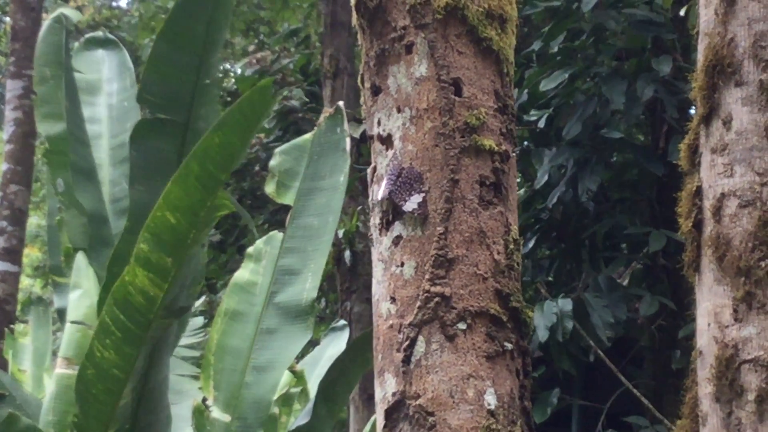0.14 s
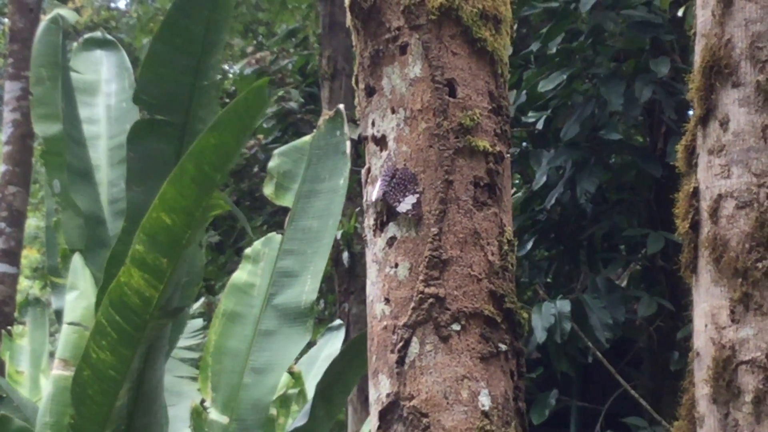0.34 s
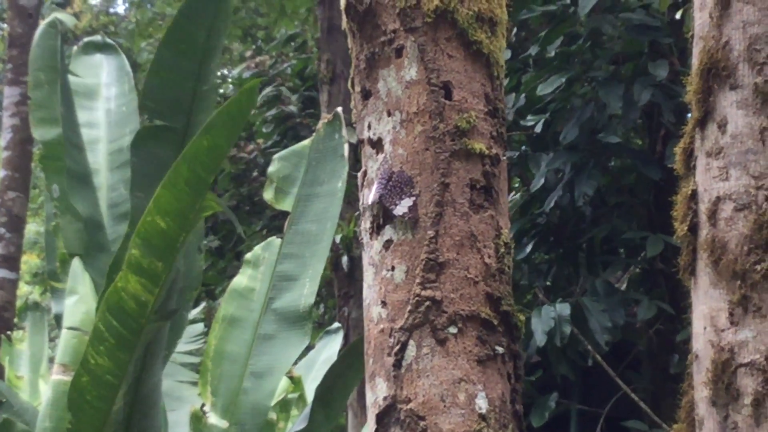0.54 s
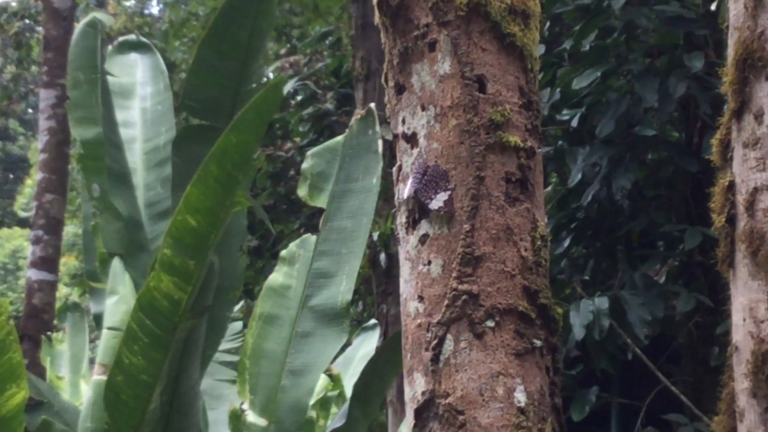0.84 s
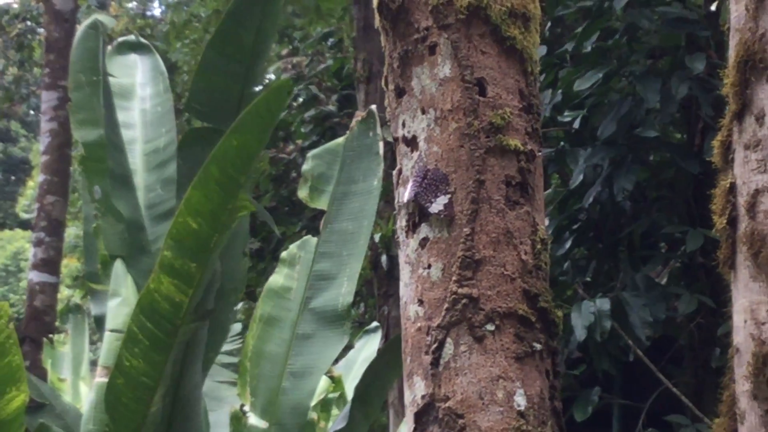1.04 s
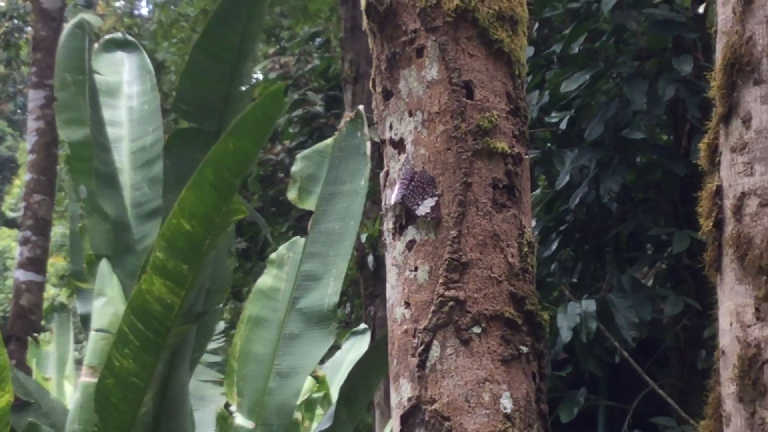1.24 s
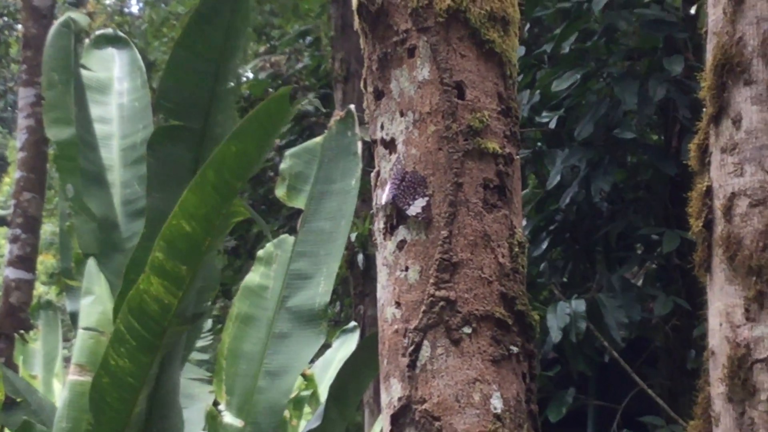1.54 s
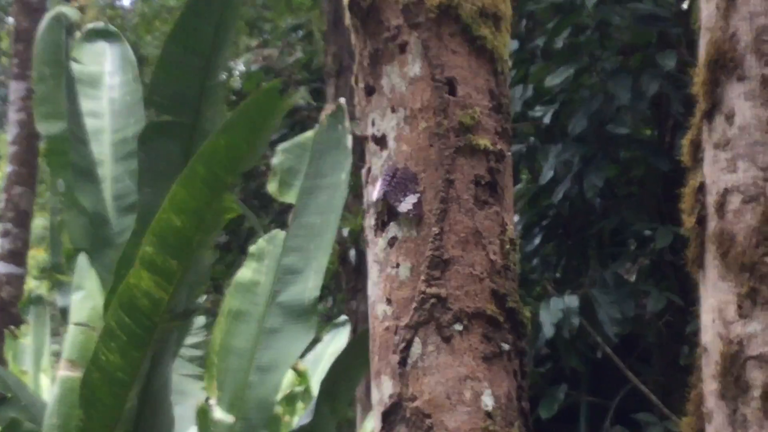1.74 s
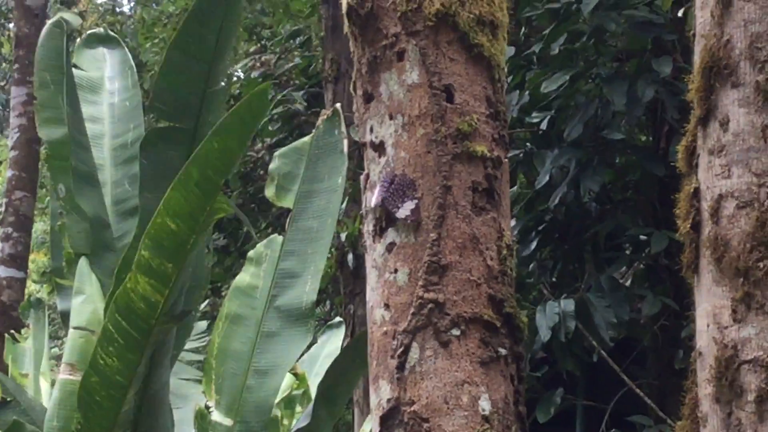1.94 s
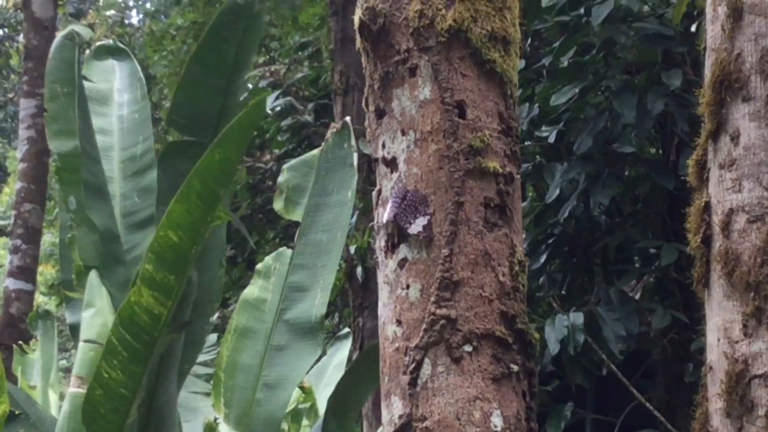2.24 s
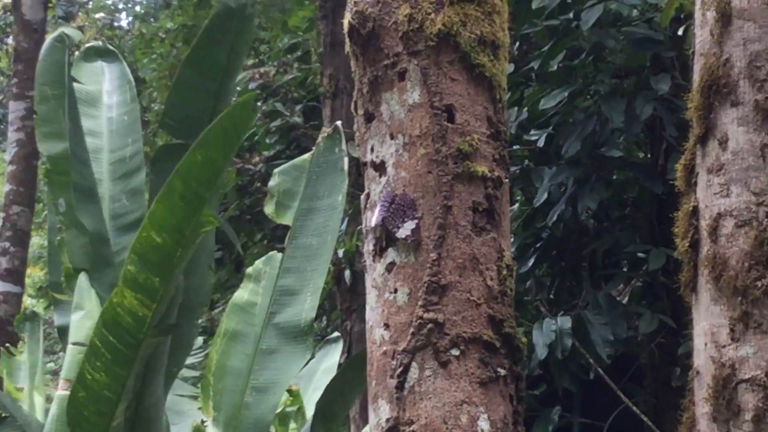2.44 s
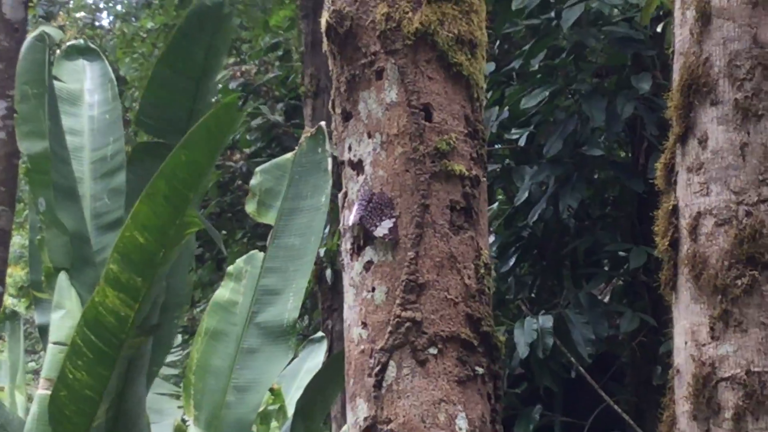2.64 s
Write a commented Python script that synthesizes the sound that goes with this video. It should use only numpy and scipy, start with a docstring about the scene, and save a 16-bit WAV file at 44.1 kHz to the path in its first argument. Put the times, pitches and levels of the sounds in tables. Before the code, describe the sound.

A steady, shrill cicada chorus fills a forest, with close rattling buzzes echoing off the trees and blending into a far high hiss. Below it are a faint low background rumble and occasional soft microphone handling bumps.

```python
"""Cicadas in a tropical forest.

Two near cicadas each snap their tymbals in a pair of sharp clicks, some forty times a second.
A far crowd is smeared by the trees into a high hiss. Below lie faint air, hum, a thin insect whine,
rumble, stirring leaves and a few soft bumps on the hand-held microphone."""
import sys
import numpy as np
from scipy import signal
from scipy.fft import rfft, irfft
from scipy.io import wavfile

SR = 44100
rng = np.random.default_rng(int(sys.argv[2]) if len(sys.argv) > 2 else 0)


def wrap_up_sound(samples):
    """Save the sound to the file named by the first command line argument, as 16-bit audio."""
    columns = np.atleast_2d(samples).T
    # keep every value between -1 and 1, then stretch to whole-number steps
    tamed = np.clip(columns, -1, 1)
    steps = np.round(tamed * 32767).astype(np.int16)
    wavfile.write(sys.argv[1], SR, steps)


N = 123921

# Noise spectra. Each row: frequency in Hz, relative density in dB.
AIR_SPECTRUM = [(20, -19), (33, -5.5), (60, -1.5), (125, -8), (200, -9), (330, -11), (460, -16.5),
                (800, -20.5), (1300, -21), (2200, -25), (6000, -28.5), (13000, -31)]
RUMBLE_SPECTRUM = [(30, -19), (90, -3.5), (170, 0), (310, -2), (450, -14.5), (1000, -35.5), (4000, -62)]
RUSTLE_SPECTRUM = [(600, -9), (1300, -3.5), (3200, 1.5), (4500, -0.5), (7000, -12.5), (13000, -26)]
# Noise envelopes. Each row: time in seconds, level in dB.
RUMBLE_ENVELOPE = [(0, -77.5), (.2, -80), (.42, -80.5), (.57, -72), (.78, -75.5), (.87, -81.5),
                   (1.1, -74.5), (1.36, -83), (1.55, -74.5), (1.85, -83), (2.08, -76), (2.25, -82.5),
                   (2.5, -76.5), (2.81, -85)]
RUSTLE_ENVELOPE = [(0, -80), (.6, -84.5), (.83, -82), (1.1, -84.5), (1.32, -80), (1.7, -78), (1.9, -84.5),
                   (2.2, -83), (2.45, -96), (2.81, -94)]
# Foliage ticks. Each row: start in seconds, level in dB, resonance in Hz.
LEAF_TICKS = [(.825, -75, 3300), (1.002, -71, 2500), (1.30, -72, 3770), (2.18, -73, 4200),
              (2.535, -77, 4700)]
# Microphone bumps. Each row: centre in seconds, envelope peak in dB, frequency in Hz.
MIC_BUMPS = [(.06, -58.5, 60), (0.289, -59.5, 56.3), (0.631, -61, 87), (.695, -57, 78), (0.917, -61, 58.3),
             (1.14, -64, 70), (1.28, -62.5, 79), (1.574, -60, 54.7), (1.674, -56.5, 55), (2.10, -63, 73),
             (2.343, -59.5, 54), (2.735, -65, 55.4)]
# Song filters. Each row: frequency in Hz, relative gain in dB.
FAR_SONG_EQ = [(5000, -55.5), (6100, -28), (7000, -13.5), (8000, -1.5), (9000, 2), (9700, 3), (10200, -4.5),
               (11200, -6.5), (12200, -9), (13300, -27.5)]
NEAR_SONG_EQ = [(5000, -61), (6100, -25.5), (7000, -13.5), (8000, -8), (9200, 0.5), (10500, -0.5),
                (11700, -2.5), (12600, -7), (13400, -14)]
# Near cicadas. Each row: start in seconds, cycle rate in Hz, gap within the click pair in seconds,
# direct level in dB, tymbal resonance in Hz.
NEAR_CICADAS = [(.0038, 44.72, .0072, -54.0, 9900), (.0031, 40.57, .00918, -56.0, 9800)]

AIR_DB = -68.5
HUM_HZ, HUM_DB = 80.8, -80.5
WHINE_HZ, WHINE_WIDTH_HZ, WHINE_DB = 2604, 90, -88.5
TICK_DECAY_S, TICK_WIDTH_HZ = .011, 1600
BUMP_SIGMA_S = .012
FAR_RATE_HZ, FAR_RATE_SPREAD, FAR_GAP_S, FAR_DB = 43, .09, .008, -51.5
LEAF_T60_S = .015
ECHO_T60_S, ECHO_GAIN_DB, ECHO_SWAY_HZ = .9, 4.5, .3
PERIOD_SPREAD, CYCLE_JITTER_S, GAP_JITTER_S = .002, .00016, .000014
TYMBAL_WIDTH_HZ, CLICK_SPREAD_DB = 4500, 1.25
CUTOFF_HZ = 13400


def from_db(db):
    """Decibels to gain."""
    return 10 ** (np.asarray(db) / 20)


def unit_rms(x):
    """Scale to unit rms."""
    return x / np.sqrt(np.mean(x ** 2) + 1e-20)


def colour(x, spectrum):
    """Filter by (Hz, dB) points; unit rms."""
    hz, db = np.transpose(spectrum)
    bins_hz = np.maximum(np.fft.rfftfreq(N, 1 / SR), 1)
    gain = from_db(np.interp(np.log(bins_hz), np.log(hz), db))
    return unit_rms(irfft(rfft(x) * gain, N))


def resonate(x, hz, width_hz):
    """Two-pole resonance, unit peak gain."""
    radius = np.exp(-np.pi * width_hz / SR)
    zeros = np.array([1, 0, -1]) * (1 - radius ** 2) / 2
    poles = [1, -2 * radius * np.cos(2 * np.pi * hz / SR), radius ** 2]
    return signal.lfilter(zeros, poles, x + 1e-18)


def scatter(x, t60_s):
    """Dense decaying reflections off leaves and trunks, built up from the start; unit rms."""
    decay_db = np.maximum(-60 * np.arange(N) / SR / t60_s, -200)
    tail = rng.standard_normal(N) * from_db(decay_db)
    return unit_rms(irfft(rfft(x) * rfft(tail), N))


def background(t):
    """Soft air, a low hum and the whine of a very distant insect."""
    air = from_db(AIR_DB) * colour(rng.standard_normal(N), AIR_SPECTRUM)
    hum = from_db(HUM_DB) * unit_rms(np.sin(2 * np.pi * HUM_HZ * t))
    whine = from_db(WHINE_DB) * unit_rms(resonate(rng.standard_normal(N), WHINE_HZ, WHINE_WIDTH_HZ))
    return air + hum + whine


def rumble(t):
    """Low noise swells and sinks."""
    level_db = np.interp(t, *np.transpose(RUMBLE_ENVELOPE))
    return from_db(level_db) * colour(rng.standard_normal(N), RUMBLE_SPECTRUM)


def foliage(t):
    """Leaves rustle faintly, with a few tiny ticks."""
    level_db = np.interp(t, *np.transpose(RUSTLE_ENVELOPE))
    out = from_db(level_db) * colour(rng.standard_normal(N), RUSTLE_SPECTRUM)
    for start_s, db, hz in LEAF_TICKS:
        decay = (t >= start_s) * np.exp(-np.abs(t - start_s) / TICK_DECAY_S)
        out += from_db(db) * decay * unit_rms(resonate(rng.standard_normal(N), hz, TICK_WIDTH_HZ))
    return out


def mic_bumps(t):
    """Each bump on the microphone is a low swell of a few cycles."""
    out = np.zeros(N)
    for centre_s, db, hz in MIC_BUMPS:
        swell = np.exp(-.5 * ((t - centre_s) / BUMP_SIGMA_S) ** 2)
        out += from_db(db) * swell * np.cos(2 * np.pi * (hz * (t - centre_s) + rng.random()))
    return out


def clicks(times_s):
    """Impulses of slightly uneven strength."""
    out = np.zeros(N)
    at = np.round(times_s * SR).astype(int)
    gains = from_db(CLICK_SPREAD_DB * rng.standard_normal(len(at)))
    inside = (at >= 0) & (at < N)
    out[at[inside]] = gains[inside]
    return out


def tymbal(start_s, rate_hz, gap_s, cycles=180):
    """Each muscle cycle buckles the tymbal in and lets it spring back: two opposite clicks."""
    periods_s = (1 + PERIOD_SPREAD * rng.standard_normal(cycles)) / rate_hz
    buckle_s = start_s + np.cumsum(periods_s) - periods_s[0]
    buckle_s += CYCLE_JITTER_S * rng.standard_normal(cycles)
    inward = clicks(buckle_s)
    outward = clicks(buckle_s + gap_s + GAP_JITTER_S * rng.standard_normal(cycles))
    return inward - outward


def far_cicadas(count=14):
    """A crowd, each at its own rate, blurred by foliage."""
    crowd = np.zeros(N)
    for phase, pace, spacing in rng.uniform(-1, 1, (count, 3)):
        rate_hz = FAR_RATE_HZ * (1 + FAR_RATE_SPREAD * pace)
        gap_s = FAR_GAP_S * (1 + .2 * spacing)
        crowd += scatter(tymbal((phase - 1) / rate_hz, rate_hz, gap_s), LEAF_T60_S)
    return from_db(FAR_DB) * colour(crowd, FAR_SONG_EQ)


def forest_echo(song, t):
    """Leaves and microphone move, so the echo drifts between two sets of reflections."""
    sway_rad = 2 * np.pi * ECHO_SWAY_HZ * t
    first, second = scatter(song, ECHO_T60_S), scatter(song, ECHO_T60_S)
    return from_db(ECHO_GAIN_DB) * (np.cos(sway_rad) * first + np.sin(sway_rad) * second)


def near_cicadas(t):
    """Click pairs ring each tymbal's resonance; the trees echo the song."""
    out = np.zeros(N)
    for start_s, rate_hz, gap_s, db, hz in NEAR_CICADAS:
        ringing = resonate(tymbal(start_s, rate_hz, gap_s), hz, TYMBAL_WIDTH_HZ)
        song = colour(ringing, NEAR_SONG_EQ)
        out += from_db(db) * (song + forest_echo(song, t))
    return out


def scene():
    """Mono sum of all sources."""
    t = np.arange(N) / SR
    cicadas = near_cicadas(t) + far_cicadas()
    return (cicadas + background(t) + rumble(t) + foliage(t) + mic_bumps(t))[None]


def record(dry):
    """Steep low-pass."""
    lowpass = signal.firwin(601, CUTOFF_HZ, fs=SR, window="blackman")
    return signal.fftconvolve(dry, lowpass[None], "same", axes=1)


dry = scene()
out = record(dry)
wrap_up_sound(out)
```